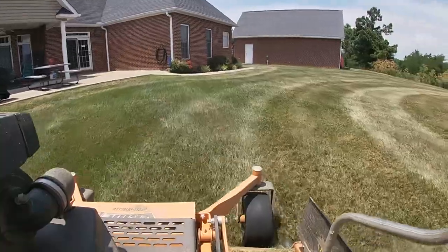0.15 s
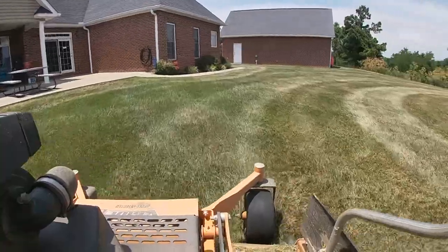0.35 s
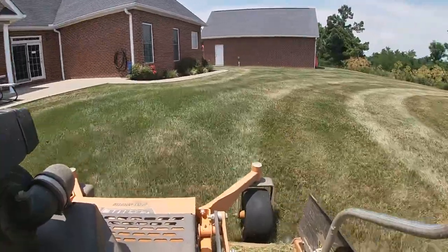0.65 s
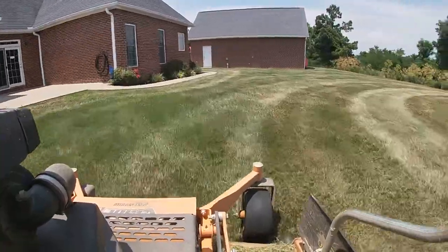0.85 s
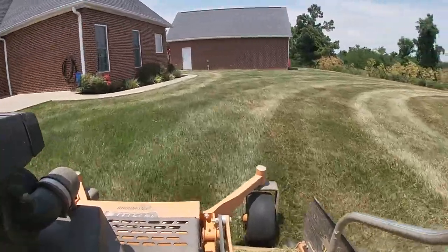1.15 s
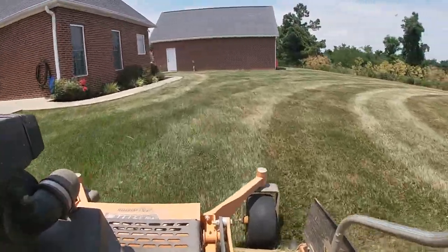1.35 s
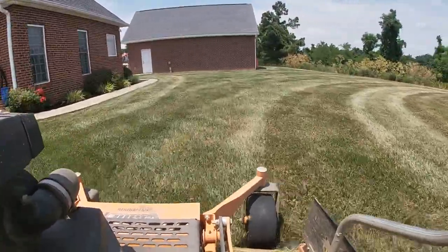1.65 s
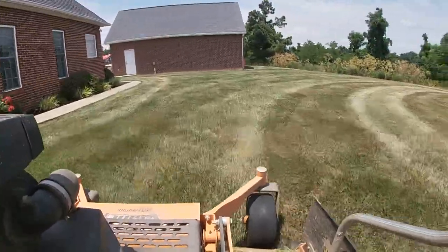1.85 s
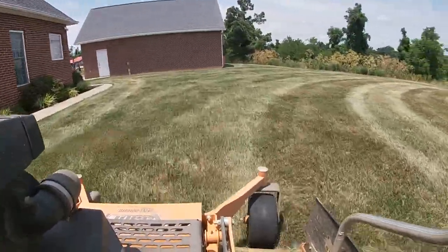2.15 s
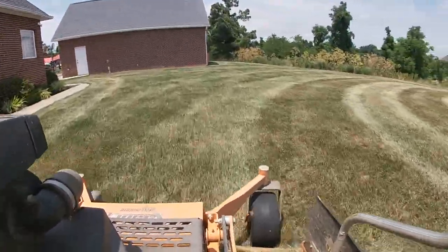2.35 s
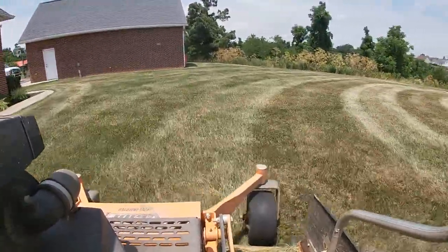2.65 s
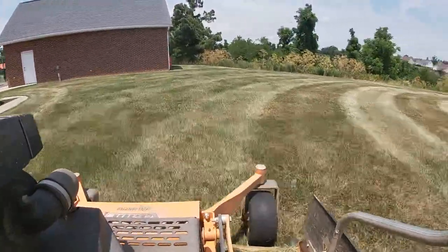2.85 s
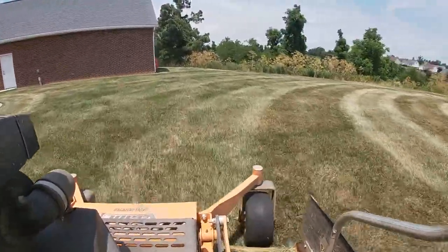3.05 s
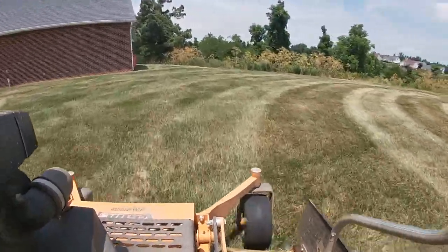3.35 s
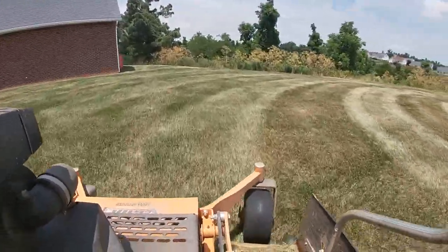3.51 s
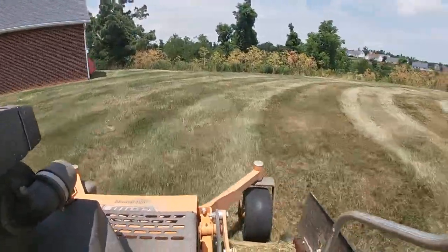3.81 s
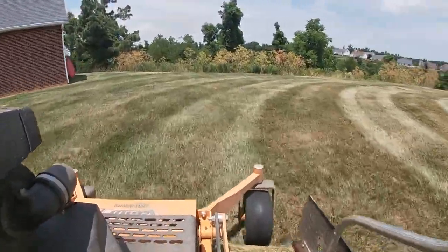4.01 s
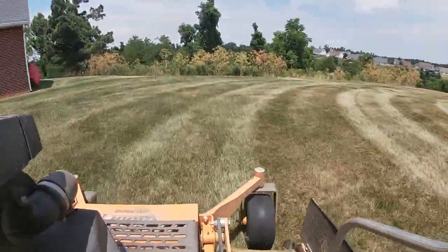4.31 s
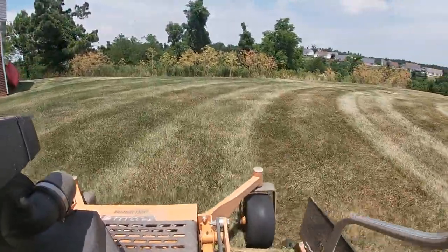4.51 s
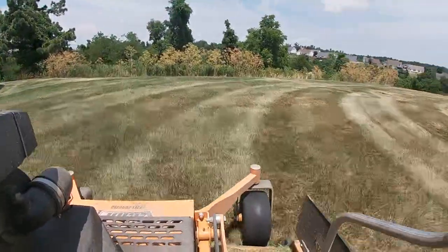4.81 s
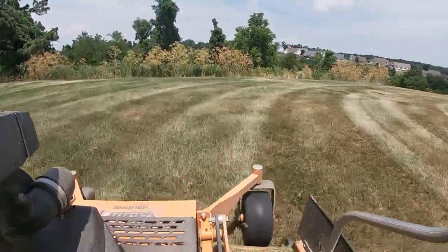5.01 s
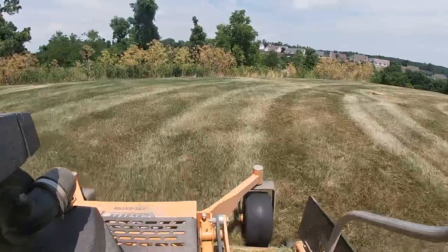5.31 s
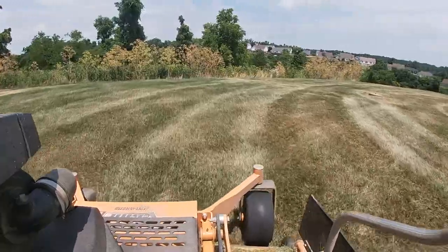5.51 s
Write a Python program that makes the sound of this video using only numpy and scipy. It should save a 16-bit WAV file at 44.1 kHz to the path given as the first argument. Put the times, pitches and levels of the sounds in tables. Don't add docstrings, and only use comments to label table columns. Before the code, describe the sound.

A riding mower's two-cylinder engine drones steadily with humming blades and roaring deck air, its brighter noise fading as house walls fall behind.

```python
import sys
import numpy as np
from scipy import signal
from scipy.io import wavfile
from scipy.ndimage import uniform_filter1d

SR = 44100
rng = np.random.default_rng(int(sys.argv[2]) if len(sys.argv) > 2 else 0)


def invert_db(level):
    return 10 ** (np.asarray(level, dtype=float) / 20)


def unload_audio(sound):
    columns = np.transpose(np.atleast_2d(sound))
    steps = np.round(np.clip(columns, -1, 1) * 32767)
    wavfile.write(sys.argv[1], SR, steps.astype(np.int16))


N = 250047
T = np.arange(N) / SR

GAP = 0.44
HISS_DB = -34


def evened(x):
    return x / np.sqrt(np.mean(x ** 2) + 1e-20)


def columns(rows):
    s, *rest = np.transpose(rows)
    return [np.interp(T, s, column) for column in rest]


def swells(rows, rest_db):
    power = invert_db(2 * rest_db)
    for middle, half_width, db in rows:
        power = power + invert_db(2 * db) * np.exp(-((T - middle) / half_width) ** 2)
    return 10 * np.log10(power)


def drift(top_hz, count=24):
    coarse = T[::64]
    hz = np.geomspace(top_hz / 20, top_hz, count)
    phase = 2 * np.pi * (hz[:, None] * coarse + rng.random((count, 1)))
    waves = np.sin(phase) / np.sqrt(hz)[:, None]
    return np.interp(T, coarse, evened(waves.sum(0)))


def noise(shape, patchy_db, size=1024):
    hop = size // 4
    hz = np.fft.rfftfreq(size, 1 / SR)
    a, b, patches = rng.standard_normal((N // hop + 5, len(hz), 3)).T
    patches = uniform_filter1d(patches, size=12, axis=0)
    patches = evened(uniform_filter1d(patches, size=10, axis=1))
    f, db = np.transpose(shape)
    colour_db = np.interp(np.log(hz + 1), np.log(f + 1), db, left=-90, right=-90)
    spectrum = (a + 1j * b) * invert_db(colour_db[:, None] + patchy_db * patches)
    _, sound = signal.istft(spectrum, nperseg=size, noverlap=size - hop)
    return evened(sound[:N])


def resonate(x, hz, width):
    turn = np.exp(2j * np.pi * hz * T)
    r = np.exp(-np.pi * width / SR)
    return 2 * (turn * signal.lfilter([1 - r], [1, -r], x / turn)).real


def tones(turns, orders, waver_db, wobble, paired=False):
    out = np.zeros(N)
    for k, db in orders:
        if paired:
            start = np.pi * (np.cos(np.pi * k * GAP) > 0)
        else:
            start = 2 * np.pi * rng.random()
        phase = 2 * np.pi * k * turns + start + wobble * drift(12)
        out += np.sqrt(2) * invert_db(db + waver_db * drift(9)) * np.cos(phase)
    return out


# t/s, f/Hz of the fifth order, level/dB
CYCLE = [(0, 150.29, -15.5), (0.35, 150.52, -16), (0.7, 150.38, -18.5), (1.05, 149.83, -16.5),
         (1.4, 149.54, -16), (1.75, 149.88, -17.0), (2.1, 150.32, -17.5), (2.45, 151.07, -15.5),
         (2.8, 151.59, -15), (3.1, 151.62, -17), (3.4, 151.6, -22), (3.7, 151.5, -22.5),
         (4.05, 151.72, -28), (4.4, 151.8, -22.5), (4.7, 151.84, -21.5), (5.0, 152.21, -22),
         (5.3, 152.07, -18), (5.67, 152.22, -16)]
# multiple of the cycle, level/dB re that part
FRAME_ORDERS = [(1, -36), (2, -25), (3, -38.5)]
BOOM_ORDERS = [(4, -19.5), (5, 1.5)]
DRONE_ORDERS = [(6, -4.5), (7, -5.5), (8, -18)]
CASE_ORDERS = [(10, -11), (11, -12.5), (12, -12.5), (13, -8), (14, -12), (15, -10.5), (16, -7), (18, -12),
               (19, -17)]
SHROUD_ORDERS = [(21, -14), (22, -10.5), (23, -6), (24, -4), (25, -9), (26, -11), (27, -15)]
# multiple of the cycle, level/dB re the hiss
FAN_ORDERS = [(30, -8), (35, -8), (36, -12.5), (42, -11), (43, -12.5), (48, -3.5), (49, -13.5), (54, -20),
              (58, -11), (60, -10.5), (66, -17), (85, -9.5), (91, -22), (96, -16)]
# middle t/s, half width t/s, peak level/dB
SHROUD_SWELLS = [
    (.3, 0.21, -35.5),
    (.85, 0.46, -31),
    (1.45, 0.18, -25),
    (2.35, 0.18, -28),
    (2.9, 0.11, -38),
    (3.5, 0.11, -37),
]
# middle t/s, half width t/s, peak level/dB
WHINE_SWELLS = [
    (2.75, .06, -38.5),
    (3.05, 0.093, -38),
    (3.4, 0.12, -38),
]


def engine(hiss_db):
    boom_hz, boom_db = columns(CYCLE)
    turns = np.cumsum(boom_hz / 5) / SR
    near_db = hiss_db - HISS_DB
    drone_db = -21 + 1.74 * (boom_db + 17)
    case_db = -28.5 + 0.58 * near_db
    shroud_db = swells(SHROUD_SWELLS, -41 + 1.9 * near_db)
    whine_db = swells(WHINE_SWELLS, -53.5)

    low = tones(turns, FRAME_ORDERS, waver_db=0.7, wobble=0.06, paired=True)
    low += invert_db(boom_db - 1.96) * tones(turns, BOOM_ORDERS, waver_db=-1.46, wobble=0.06, paired=True)
    low += invert_db(drone_db) * tones(turns, DRONE_ORDERS, waver_db=1.2, wobble=0.12, paired=True)
    buzz = invert_db(case_db) * tones(turns, CASE_ORDERS, waver_db=3.5, wobble=0.9)
    buzz += invert_db(shroud_db) * tones(turns, SHROUD_ORDERS, waver_db=2.5, wobble=0.5)
    buzz += invert_db(whine_db) * tones(turns, [(96, 0)], waver_db=4, wobble=1.6)
    fan = invert_db(hiss_db) * tones(turns, FAN_ORDERS, waver_db=3.0, wobble=1.2)
    return low + buzz + fan, turns


def firings(turns, decay=0.11, second_db=-3):
    strength = invert_db(2.0 * rng.standard_normal((400, 2)))
    puffs = np.zeros(N)
    for k, db in enumerate([0, second_db]):
        since = turns - k * GAP + 1
        age = since % 1 / decay
        puffs += invert_db(db) * strength[since.astype(int), k] * np.sqrt(age) * np.exp(-age)
    return evened(puffs)


# t/s, f/Hz, level/dB
BLADE_PASS = [(0, 113.9, -18), (0.35, 113.9, -20.5), (0.7, 113.4, -20.5), (1, 112.8, -18),
              (1.3, 112.4, -24.5), (1.7, 112.56, -21.5), (2.1, 112.57, -22), (2.5, 112.9, -22),
              (2.8, 114, -19), (3.05, 113.5, -18.1), (3.3, 113.8, -14.0), (3.6, 114, -12.5),
              (4, 114, -11.5), (4.4, 114, -11.5), (4.75, 114, -13), (5.05, 114.9, -14.2),
              (5.35, 114.2, -17.5), (5.67, 115.5, -22)]
# multiple of the spindle speed, level/dB re the roar
TIP_ORDERS = [(10, -14), (12, -13), (14, -22)]
# middle t/s, half width t/s, peak level/dB
THIRD_ORDER = [
    (.8, 0.077, -23),
    (1.2, 0.13, -23),
    (1.8, 0.099, -25),
    (2.67, 0.13, -22.5),
    (3.4, 0.13, -36),
    (4.0, .1, -29),
    (5.4, .25, -23),
]
SECOND_PASS = [
    (.2, 0.24, -20),
    (1.2, 0.23, -18),
    (2.4, 0.21, -21),
    (2.8, .3, -15.5),
    (3.6, 0.15, -26.5),
    (4.301, 0.11, -30),
    (5.5, 0.37, -20),
]
THIRD_PASS = [
    (1.1, 0.25, -27),
    (3.2, 0.3, -26),
    (4.95, .22, -30.5),
    (5.67, 0.11, -49),
]
FOURTH_PASS = [
    (.35, 0.22, -37),
    (1.0, .15, -29),
    (2.2, 0.24, -29.5),
    (2.8, 0.14, -32.5),
    (3.3, 0.15, -29.5),
    (4.0, 0.14, -39),
    (4.65, 0.1, -36),
    (5.3, 0.15, -35.5),
]
OUT_OF_STEP = [-39, -33.5, -45, -50.5]


def blades(roar_db):
    pass_hz, pass_db = columns(BLADE_PASS)
    turns = np.cumsum(pass_hz / 2) / SR
    beats = [THIRD_ORDER, SECOND_PASS, THIRD_PASS, FOURTH_PASS]
    levels_db = [pass_db]
    for rows, rest_db in zip(beats, OUT_OF_STEP):
        levels_db.append(swells(rows, rest_db))
    hum = np.zeros(N)
    for k, db in zip([2, 3, 4, 6, 8], levels_db):
        hum += invert_db(db) * tones(turns, [(k, 0)], waver_db=0.3 * k, wobble=0.005 * k ** 2)
    return hum + invert_db(roar_db) * tones(turns, TIP_ORDERS, waver_db=-2.5, wobble=0.29)


# t/s, level/dB
AIR_LEVEL = [(0, -32.5), (0.3, -31), (0.6, -29), (0.9, -28.0), (1.2, -29), (1.6, -28), (1.95, -28),
             (2.25, -27), (2.55, -28), (2.75, -28.5), (3.1, -29), (3.45, -29), (3.7, -31), (3.95, -33.5),
             (4.3, -35), (4.75, -37.0), (5.2, -36), (5.67, -35.5)]


def air_levels():
    air_db = columns(AIR_LEVEL)[0] + 28
    rumble_db = -27.5 + 0.71 * air_db + 0.7 * drift(4.2)
    roar_db = -25 + 1.1 * air_db
    hiss_db = HISS_DB + 1.06 * air_db
    return rumble_db, roar_db, hiss_db


# f/Hz, level/dB
RUMBLE_SPECTRUM = [(100, -5.5), (135, -9.5), (170, 1), (195, 0), (225, 0), (250, -12), (300, -23.5),
                   (400, -46)]
THRUM_SPECTRUM = [(200, -31), (255, -5.5), (290, 2), (350, 3), (480, -0.5), (600, -0.5), (720, 0),
                  (800, -8), (1000, -24)]
ROAR_SPECTRUM = [(460, -37), (780, -3.5), (956, -6), (1050, -2), (1150, -7.5), (1420, -3.5), (1590, -7),
                 (2480, -9.5), (2710, -13), (3010, -12), (3400, -27.5), (4420, -23.5), (7480, -120)]
# f/Hz, bandwidth f/Hz, level/dB
PANEL_MODES = [(727, 110, -10), (998, 140, -17), (1416, 57, -17.5), (2517, 150, -26.5), (2884, 8.8, -31),
               (3734, 210, -21), (4530, 27, -28), (5080, 220, -22.5), (5570, 68, -25)]


def deck(rumble_db, roar_db, puffs):
    rumble = invert_db(rumble_db + 7) * noise(RUMBLE_SPECTRUM, patchy_db=0.3, size=4096)
    thrum = noise(THRUM_SPECTRUM, patchy_db=0.4, size=2048)
    roar = evened(1 + 0.038 * puffs) * noise(ROAR_SPECTRUM, patchy_db=0.65)
    white = rng.standard_normal(N)
    panels = np.zeros(N)
    for hz, width, db in PANEL_MODES:
        ring = resonate(resonate(white, hz, width), hz, width)
        panels += invert_db(db + 2.0 * drift(8)) * evened(ring)
    return rumble + invert_db(roar_db + 0.76 * drift(30)) * (thrum + roar + panels)


# f/Hz, level/dB
HISS_SPECTRUM = [(1820, -26), (3100, 2), (3410, -4.5), (5460, -7), (7190, -12.5), (8220, -16),
                 (9930, -26.5), (12900, -24.5), (15800, -37)]
# f/Hz, level/dB
CLATTER_SPECTRUM = [(3000, -21), (4000, -10), (6000, -5.5), (7500, -7), (9000, -16), (10200, -23),
                    (12900, -17), (15800, -33)]


def exhaust(puffs, hiss_db):
    hiss = invert_db(0.18 * drift(27)) * noise(HISS_SPECTRUM, patchy_db=1.5, size=512)
    clatter = invert_db(-9.5) * puffs * noise(CLATTER_SPECTRUM, patchy_db=0.5, size=256)
    return invert_db(hiss_db) * (hiss + clatter)


# t/s, peak level/dB
DECK_STRIKES = [
    (1.4316, -29),
    (1.7325, -23),
    (1.9822, -18),
    (2.5638, -20),
    (3.4536, -36),
    (3.6666, -26),
    (3.7194, -24),
    (4.3229, -38),
]


def clippings(hiss_db, per_s=150):
    excess_db = 1.04 * np.minimum(rng.exponential(1, N), 3)
    hits = invert_db(hiss_db - 6.0 + excess_db) * (rng.random(N) < per_s / SR)
    for s, db in DECK_STRIKES:
        hits[round(s * SR)] = invert_db(db - 4.0)
    age = T[:600]
    spit = np.exp(-age / 0.0048) * (1 - np.exp(-age / 0.0002))
    return signal.oaconvolve(hits, spit)[:N] * noise(HISS_SPECTRUM, patchy_db=-0.5, size=256)


# middle t/s, half width t/s, peak level/dB
WIND_GUSTS = [(.35, .04, -40), (.64, .07, -33), (1.4, 0.071, -32), (1.86, .1, -33), (2.3, 0.14, -41),
              (2.57, 0.028, -35), (3.68, 0.056, -39), (4.12, 0.044, -35), (4.58, .06, -42), (5.0, .05, -43),
              (5.67, .06, -43)]
# f/Hz, level/dB
WIND_SPECTRUM = [(15, -5), (30, -8), (60, 8), (110, -3.5), (160, -28)]


def wind():
    gust_db = swells(WIND_GUSTS, -45.5)
    return invert_db(gust_db + 8.5) * noise(WIND_SPECTRUM, patchy_db=3.0, size=4096)


def scene():
    rumble_db, roar_db, hiss_db = air_levels()
    drone, turns = engine(hiss_db)
    puffs = firings(turns)
    mower = drone + blades(roar_db) + deck(rumble_db, roar_db, puffs) + exhaust(puffs, hiss_db)
    return (mower + clippings(hiss_db) + wind())[None]


def band_limit(x):
    return signal.sosfilt(signal.butter(12, 15720, fs=SR, output="sos"), x)


def record(dry):
    ceiling = 1.2
    mix = ceiling * np.tanh(dry / ceiling)
    return band_limit(mix)


dry = scene()
out = record(dry)
unload_audio(out)
```